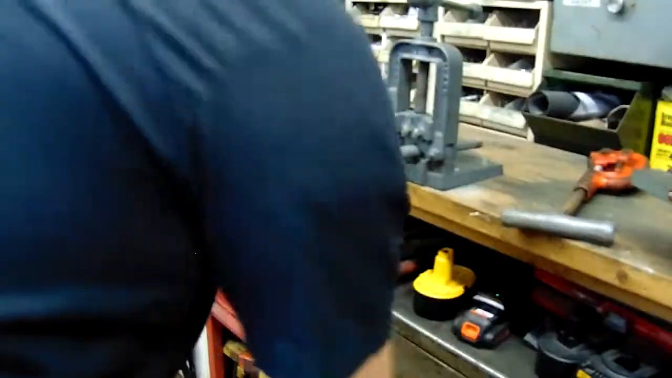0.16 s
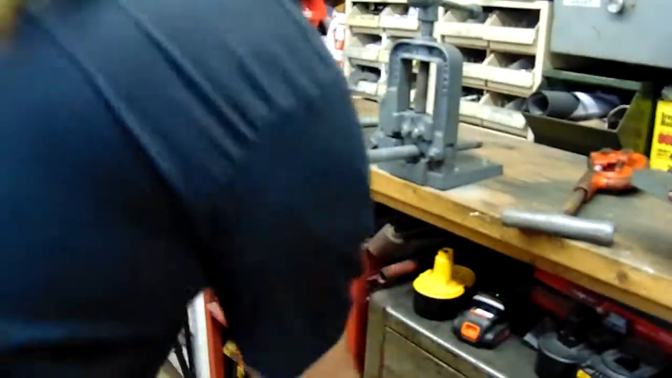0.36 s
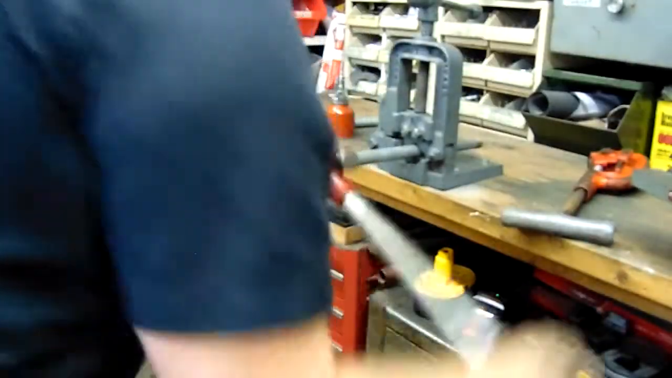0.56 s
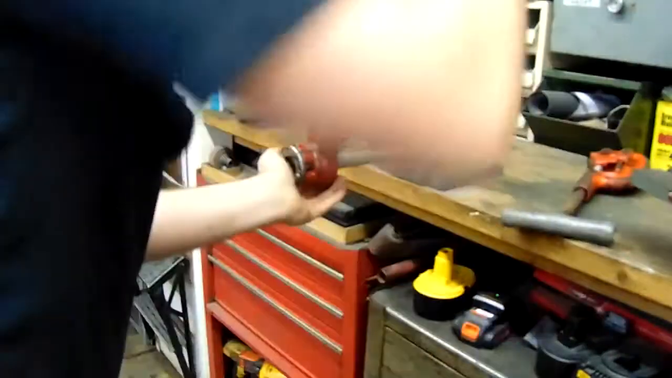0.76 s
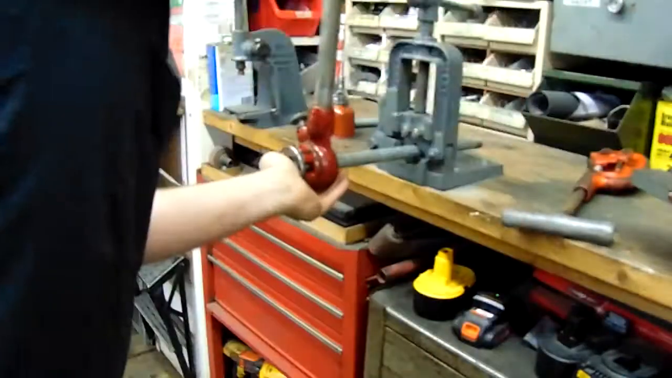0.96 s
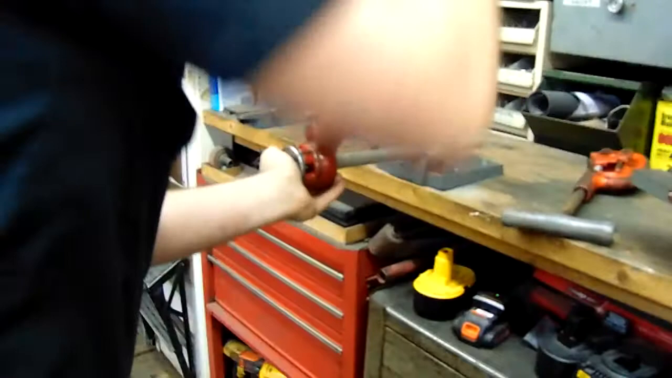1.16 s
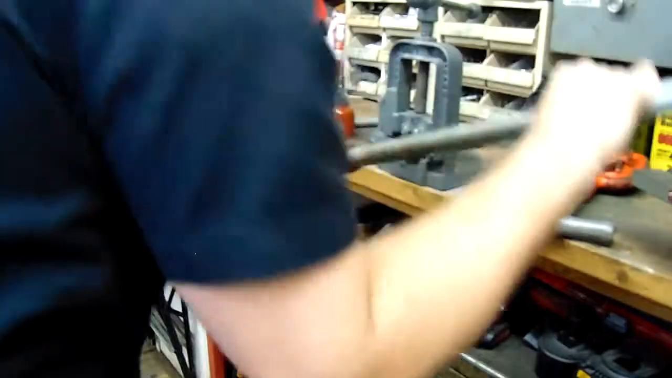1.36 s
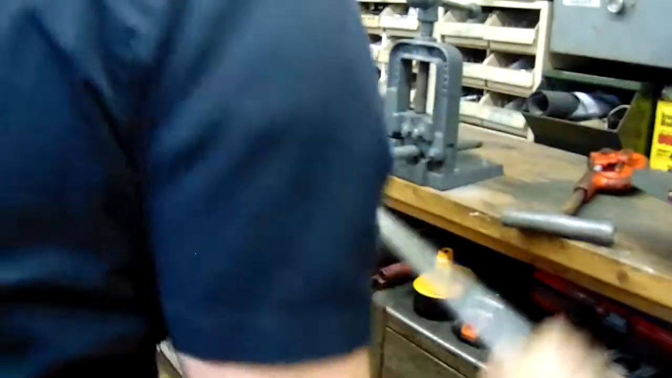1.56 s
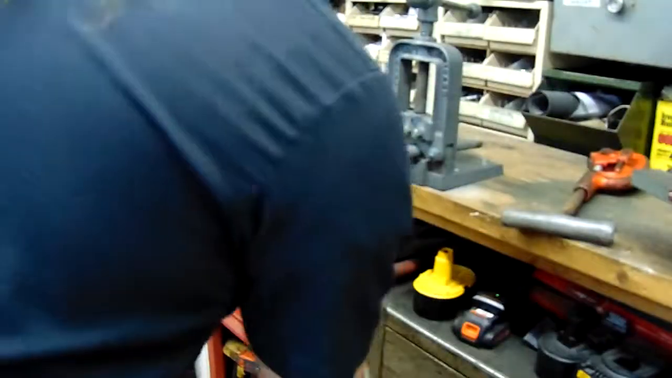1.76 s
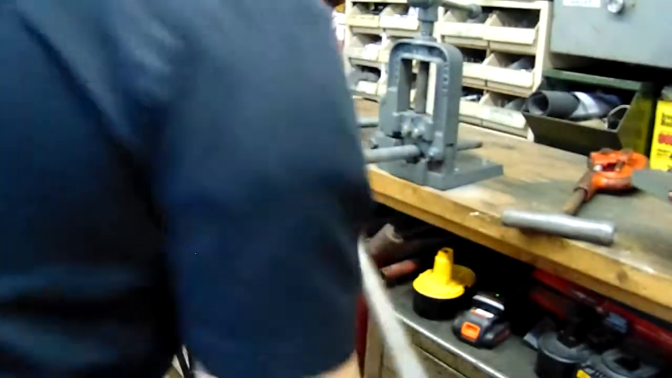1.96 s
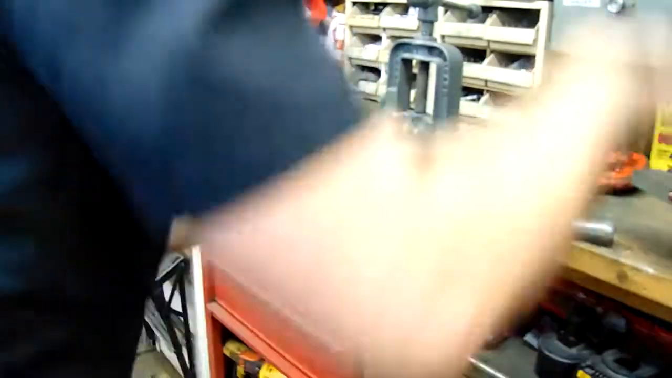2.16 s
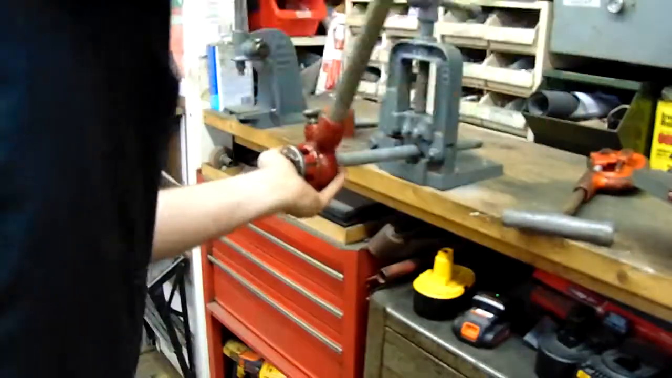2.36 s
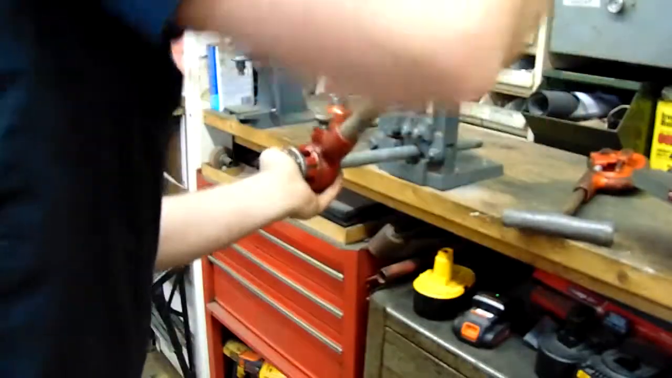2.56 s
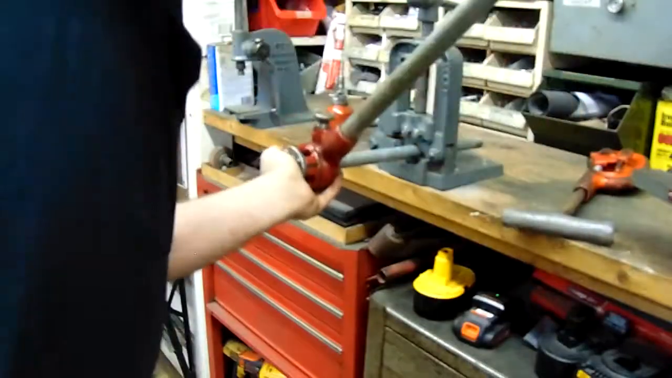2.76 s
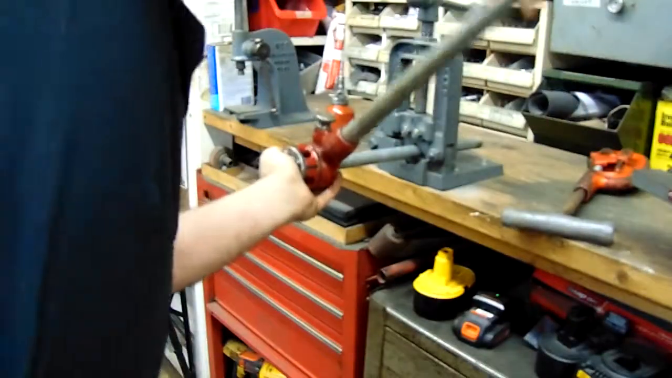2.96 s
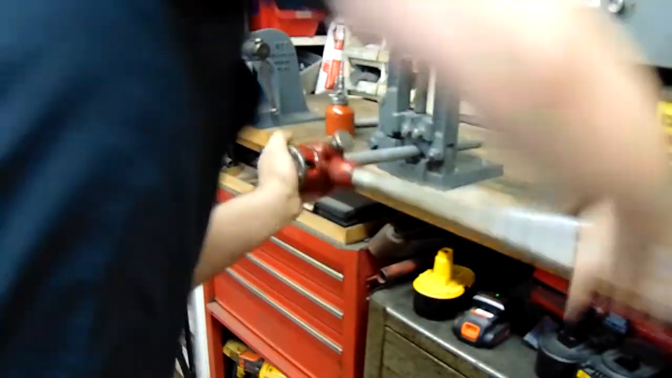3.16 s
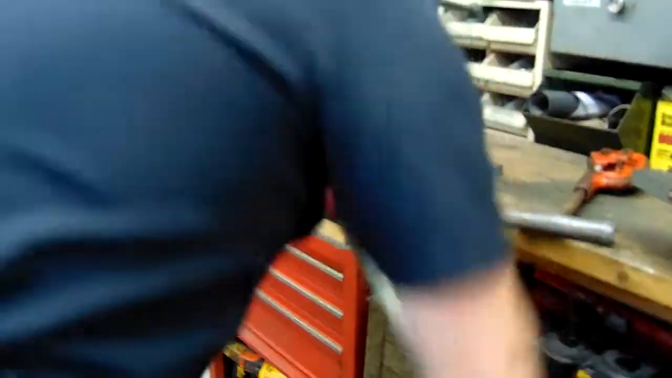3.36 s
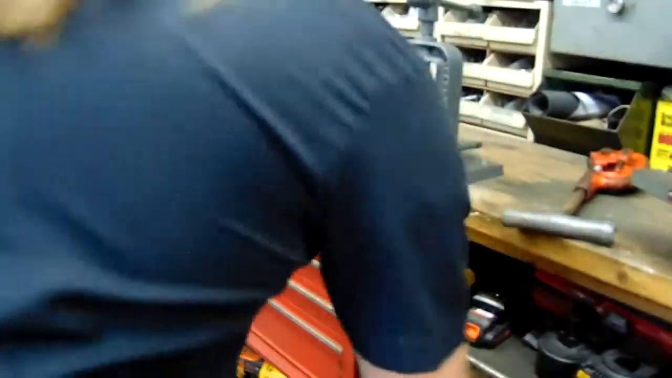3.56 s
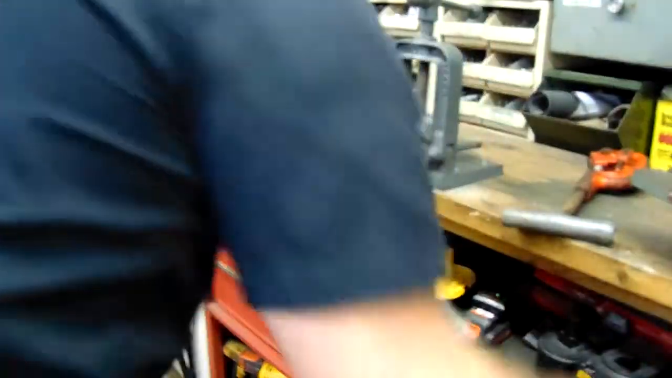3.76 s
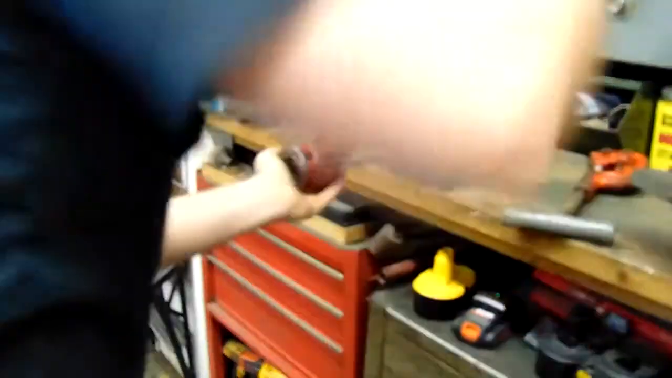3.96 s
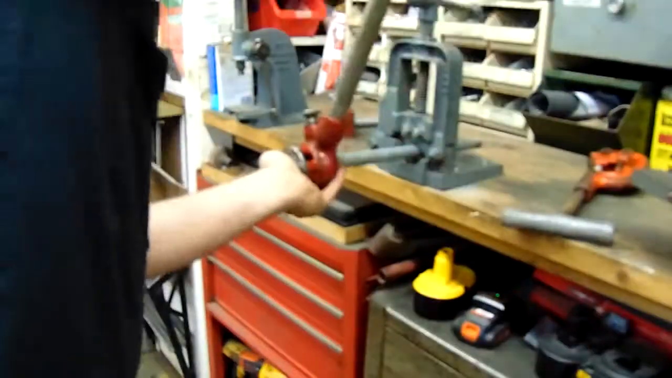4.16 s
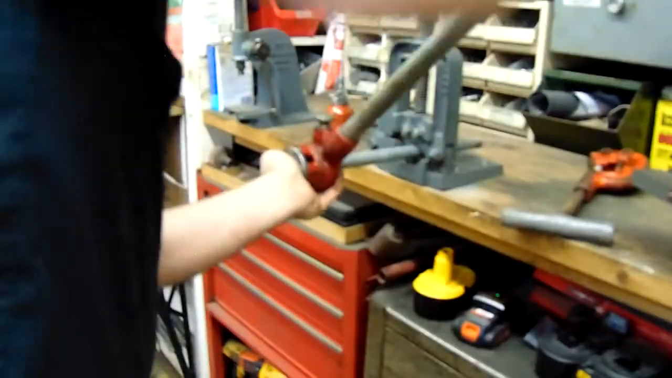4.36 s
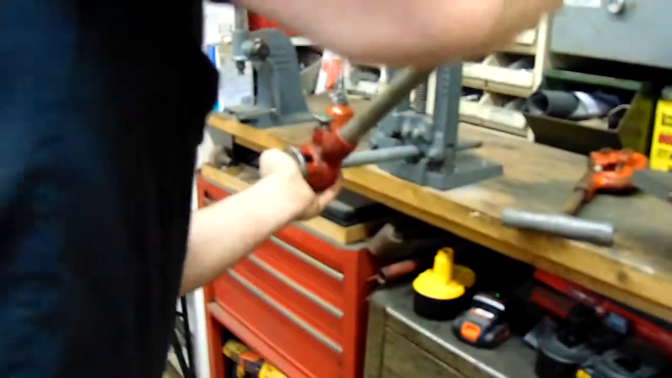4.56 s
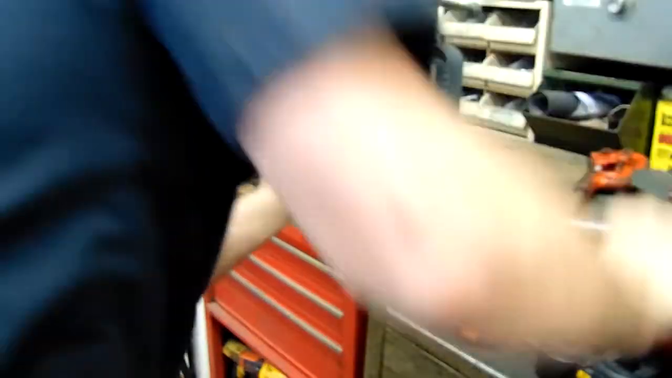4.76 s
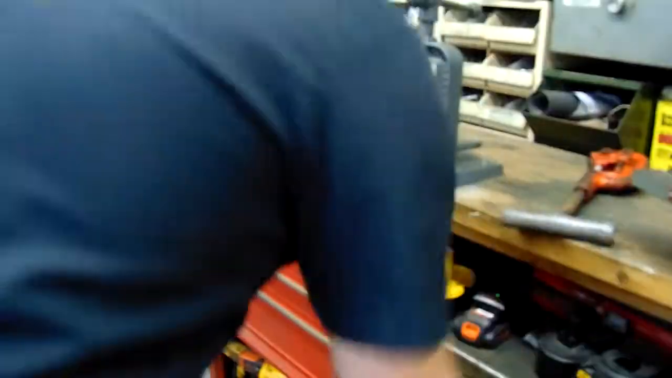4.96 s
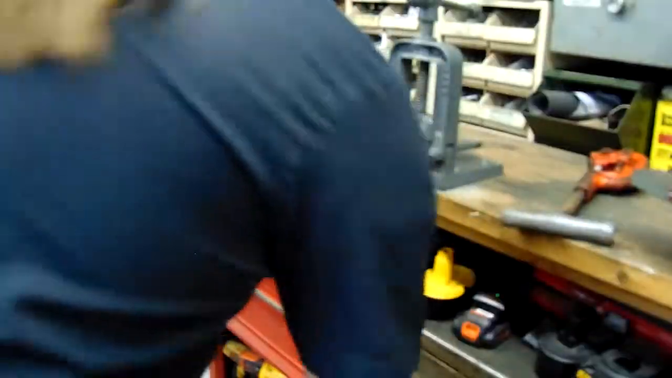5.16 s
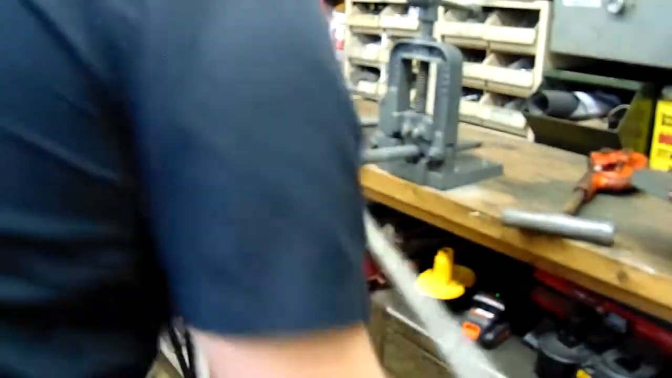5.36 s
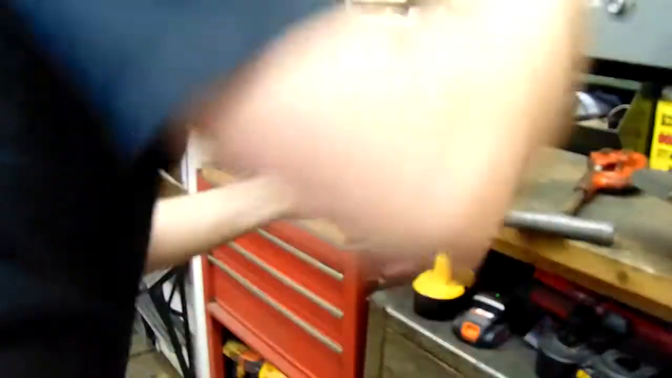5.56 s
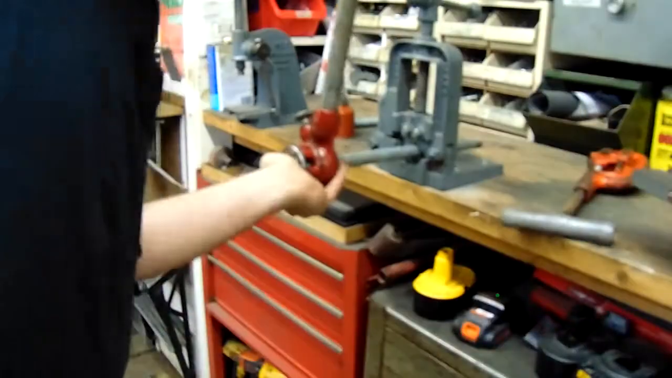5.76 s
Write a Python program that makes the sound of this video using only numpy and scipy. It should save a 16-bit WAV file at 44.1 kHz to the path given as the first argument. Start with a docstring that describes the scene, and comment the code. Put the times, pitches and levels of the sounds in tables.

```python
"""Small workshop: a ratcheting hand threader works a steel pipe held in a bench vice.
On each back swing the pawl snaps over three or four teeth. At each turn of the stroke the loose head
clanks and the bench thuds. On the down stroke the dies scrape softly in the steel.
Faint rumble, hiss and machine hum lie underneath."""
import sys
import numpy as np
from scipy import signal
from scipy.fft import rfft, irfft
from scipy.io import wavfile
from scipy.ndimage import uniform_filter1d

SR = 44100
rng = np.random.default_rng(int(sys.argv[2]) if len(sys.argv) > 2 else 0)


def transcribe(signal):
    """Save signal, clipped to [-1, 1], as a 16-bit WAV file at the path in sys.argv[1]."""
    frames = np.atleast_2d(signal).T
    limited = np.clip(frames, -1, 1)
    pcm = np.round(limited * 32767).astype(np.int16)
    wavfile.write(sys.argv[1], SR, pcm)


N = 256220
BLOW_N = 24576
AGE_S = np.arange(BLOW_N) / SR
OCTAVES_HZ = 30 * 2. ** np.arange(10)

# modes of head and handle: f/Hz, level/dB, t60/s
STEEL_MODES = [(466, 3.5, 0.22), (511, -3, 0.19), (1044, -6.5, 0.3), (1095, -1.5, 0.22), (1500, -22, 0.28),
               (1794, -14.5, 0.44), (2097, -26, 0.11), (2294, -1, 0.15), (2460, -44, 0.084),
               (2910, -20, 0.52), (3180, -16, 0.35), (3237, -10.5, 0.46), (3370, -32, 0.45),
               (3660, -16, 0.2), (3580, -7.5, 0.3), (4130, -38, 0.1), (4150, -13, 0.33),
               (4460, -13.5, 0.26), (4730, -12, 0.36), (4670, -21, 0.51), (5250, -14, 0.47),
               (5480, -14, 0.25), (6770, -24, 0.17), (8600, -6, 0.18), (11450, -12.5, 0.23)]
# contacts of loose head and pipe: t/s, level/dB, contact/ms, leading f/Hz
CLANKS = [(0.146, -59.5, .04, 565), (0.482, -37.5, 0.21, 1003), (0.523, -39, 0.28, 444),
          (0.588, -48, 0.21, 4640), (1.192, -39, 0.068, 480), (1.217, -24.5, 0.44, 657),
          (1.245, -31.5, 0.03, 5000), (1.285, -20.5, .07, 737), (1.423, -29, 1.17, 510),
          (1.841, -25.5, 0.85, 953), (1.955, -36, 1.9, 510), (1.987, -37.5, 0.23, 537),
          (1.998, -28.5, 0.56, 575), (2.03, -39.5, 0.11, 6800), (2.651, -39.5, 0.13, 1060),
          (2.672, -27, 0.16, 475), (3.69, -29.5, 1.2, 513), (3.723, -22.5, 0.21, 4780),
          (4.414, -32, 0.025, 1046), (4.452, -33.5, 0.073, 496), (4.477, -24.5, 0.4, 1087),
          (5.261, -29, 1.06, 517), (5.317, -24, 0.29, 4820)]
# clank base spectrum, tone of the hardest clank, stirred resonances: f/Hz, level/dB
CLANK_SPECTRUM = [(60, -18.5), (160, -16.5), (280, -3), (600, 6), (1000, 7.5), (1450, 2.5), (2500, 4),
                  (4800, -0.5), (7000, -4.5), (10000, -13.5), (14000, -6.5)]
CLANK_TONE = [(800, -1.5), (2600, 4.5), (5400, 1.5), (10000, 0.5)]
CLANK_PEAKS = [(470, 5.5), (1045, 0), (2380, -3), (4850, 1.5), (6770, 1.5), (11200, 6)]


def undb(db):
    """Decibels to gain."""
    return 10 ** (np.asarray(db) / 20)


def lookup(points, hz):
    """Interpolate a (f/Hz, value) table over log frequency."""
    f, values = np.transpose(points)
    return np.interp(np.log(np.maximum(hz, 1)), np.log(f), values)


def decay(t60_s):
    """Exponential fall, 60 dB in t60_s."""
    return np.exp(-np.log(1000) * AGE_S / max(t60_s, 1e-3))


def add(track, t_s, sound):
    """Mix sound into track at t_s."""
    i = max(int(t_s * SR), 0)
    track[i:i + len(sound)] += sound[:max(N - i, 0)]


def shape(x, spectrum):
    """Filter x by a (f/Hz, level/dB) table; rms 1."""
    gain = undb(lookup(spectrum, np.fft.rfftfreq(len(x), 1 / SR)))
    y = irfft(rfft(x) * gain, len(x))
    return y / y.std()


def wander(rate_hz):
    """Smooth random drift, unit spread."""
    hold = int(SR / rate_hz)
    steps = np.repeat(rng.standard_normal(N // hold + 1), hold)
    drift = uniform_filter1d(uniform_filter1d(steps, hold), hold)[:N]
    return drift / drift.std()


def stirred(peaks, scatter_db=3):
    """Each blow excites the resonances a little differently."""
    return [(hz, db + scatter_db * rng.standard_normal()) for hz, db in peaks]


def softened(tone, contact_ms):
    """Long contacts are dull: -12 dB/octave above 1 / contact time."""
    cycles = OCTAVES_HZ * contact_ms / 1000
    return np.c_[OCTAVES_HZ, lookup(tone, OCTAVES_HZ) - 10 * np.log10(1 + cycles ** 4)]


def impact(spectrum, tone, peaks, t60_s, rise_cycles, room_db):
    """Dense short modes of one blow plus room wash; low bands build up more slowly."""
    room_t60 = [(100, 0.83), (400, 0.36), (1500, 0.4252), (3500, 0.4028), (7000, 0.3769), (13000, 0.06)]  # reverberation time: f/Hz, t60/s
    room_wet = [(100, 1), (400, -2.5), (1000, -5), (3000, -11.5), (7000, -5), (13000, -11)]  # reverberation against the blow: f/Hz, level/dB
    f = np.fft.rfftfreq(BLOW_N, 1 / SR)
    # modes bunch unevenly: a random ripple, fine-grained low down and coarser towards the treble
    knots_hz = np.arange(300) ** 2 / 4
    ripple_db = np.interp(f, knots_hz, rng.standard_normal(len(knots_hz))) * np.minimum(f / 900, 1)
    db = lookup(tone, f) + ripple_db
    for hz, peak_db in peaks:
        db += peak_db / (1 + ((f - hz) / 70) ** 2)
    bins = rfft(shape(rng.standard_normal(BLOW_N), spectrum)) * undb(db)
    out = np.zeros(BLOW_N)
    for hz, share in zip(OCTAVES_HZ, np.eye(len(OCTAVES_HZ))):
        band = irfft(bins * lookup(np.c_[OCTAVES_HZ, share], f))
        rise = 1 - np.exp(-(AGE_S / min(rise_cycles / hz, .012)) ** 2)
        room = undb(lookup(room_wet, hz) + room_db) * decay(lookup(room_t60, hz))
        out += band * rise * np.hypot(decay(t60_s), room)
    return out


def ring(modes, scatter_db, detune, rise_cycles):
    """Decaying modes; level, pitch and phase vary per blow."""
    out = np.zeros(BLOW_N)
    for hz, db, t60_s in modes:
        size, shift, phase = rng.standard_normal(3)
        wave = np.sin(2 * np.pi * (hz * (1 + detune * shift) * AGE_S + phase))
        rise = 1 - np.exp(-AGE_S * hz / rise_cycles)
        out += undb(db + scatter_db * size) * wave * decay(t60_s) * rise
    return out


def steel_ring(tone, peaks, pair_db, pair_t60_s):
    """The threader's own modes plus beating pairs set by where the parts touch."""
    modes = list(STEEL_MODES)
    for hz, peak_db in peaks:
        db = .5 * peak_db + pair_db - .5 - hz / 2800  # high modes lose more to friction
        modes += [(hz + split_hz, db, pair_t60_s) for split_hz in (-13, 13)]
    modes = [(hz, db + lookup(tone, hz), t60_s) for hz, db, t60_s in modes]
    return ring(modes, scatter_db=2.5, detune=0.0021, rise_cycles=10.7)


def shop():
    """Steady rumble and hiss, wavering machine hum."""
    hum_lines = [(355, -66), (554.5, -65.5)]  # f/Hz, rms level/dB
    noise_spectrum = [(20, 1), (40, 0.5), (58, 0), (110, -6), (170, -23.5), (230, -7.5), (320, -19),
                      (420, -15.5), (700, -14), (1000, -15), (1600, -20), (3600, -25.5), (5700, -28.5),
                      (14000, -30)]  # f/Hz, level/dB
    t = np.arange(N) / SR
    hum = np.zeros(N)
    for hz, db in hum_lines:
        amplitude = np.sqrt(2) * undb(db + 2 * wander(3.52))
        hum += amplitude * np.sin(2 * np.pi * hz * t + wander(3.8))
    return hum + shape(rng.standard_normal(N), noise_spectrum) * undb(-54 + .5 * wander(5.47))


def push(bite_db_per_s=240, release_db_per_s=232):
    """Force on the dies per down stroke: bite, build or ease, release."""
    strokes = [(0, 0.337, -58, -6), (1.574, 1.804, -50, 40), (3.16, 3.57, -54, 11.5),
               (4.75, 5.15, -49.5, 20.5)]  # start/s, end/s, end level/dB, growth/(dB/s)
    t, force = np.arange(N) / SR, np.zeros(N)
    for start_s, end_s, db, growth in strokes:
        edges_db = bite_db_per_s * np.maximum(start_s - t, 0) + release_db_per_s * np.maximum(t - end_s, 0)
        force += undb(db + growth * (np.clip(t, start_s, end_s) - end_s) - edges_db)
    return force


def dies():
    """Tiny chips tear from the pipe: a dense, uneven scrape that rings the steel."""
    scrape_spectrum = [(200, -3), (350, 1.5), (700, 0.5), (1030, 1.5), (1500, -2), (1900, -10.5),
                       (2300, -4.5), (3300, -7.5), (4300, -12), (5200, -23.5), (14000, -21.5)]  # f/Hz, level/dB
    chips = rng.standard_normal(N) * undb(0.47 * rng.exponential(size=N))
    damped_modes = [(hz, 0, .05) for hz, _, _ in STEEL_MODES]  # engaged dies damp the head
    head = ring(damped_modes, scatter_db=1.0, detune=0.0082, rise_cycles=1)
    ringing = signal.fftconvolve(chips, head / np.linalg.norm(head))[:N]
    scrape = shape(chips + undb(-7.5) * ringing, scrape_spectrum)
    return scrape * push() * undb(1.3 * wander(60) + 2.5)


def bench(settle_s=0.086, settle_db=-5.5, rattle_lag_s=0.05):
    """The vice loads the wooden bench: it thuds, rocks, settles back once and rattles the head."""
    turns = [(1.295, -22, -42.5), (1.999, -32, -54), (2.695, -31.5, -38.5), (3.734, -30.5, -46),
             (4.484, -35.5, -38), (5.322, -28, -47.5)]  # ends of the handle's swing: t/s, thud/dB, rocking/dB
    bench_modes = [(118.6, -17, 0.38), (236.5, 1, 0.15), (258.1, 6, 0.14), (295.4, -1.5, 0.24),
                   (326, 1, 0.27), (481, -6, 0.23), (626, -3, 0.14), (760, -4.5, 0.21), (839, -10.5, 0.35)]  # bench and vice: f/Hz, level/dB, t60/s
    rock_spectrum = [(20, 0), (42, -4.5), (57, 9), (70, -21), (83, 11), (102, -3), (123, 2.5), (165, -15),
                     (240, 1), (500, -17.5), (1000, -16), (3000, -39)]  # f/Hz, level/dB
    out = np.zeros(N)
    # brief contacts pass less to the bench
    knocks = [(t_s, db - 9.5 + 10 * np.log10(contact_ms)) for t_s, db, contact_ms, _ in CLANKS]
    thuds = [(t_s, db) for t_s, db, _ in turns]
    for t_s, db in knocks + thuds:
        add(out, t_s, undb(db) * ring(bench_modes, scatter_db=1.0, detune=0.013, rise_cycles=0.41))
    rattle_tone = softened(CLANK_TONE, contact_ms=.38)
    for t_s, _, db in turns:
        for lag_s, loss_db in ((0, 0), (settle_s, settle_db)):
            rocking = shape(rng.standard_normal(BLOW_N), rock_spectrum) * (decay(0.59) - decay(0.028))
            add(out, t_s + lag_s, undb(db + loss_db + 7.5) * rocking)
        rattle = impact(CLANK_SPECTRUM, rattle_tone, CLANK_PEAKS, t60_s=0.075, rise_cycles=3.1, room_db=8)
        add(out, t_s + rattle_lag_s, undb(db + 3.5) * rattle)
    return out


def clanks(lead_db=4.5):
    """The loose head takes up its slack: contacts from light, bright clinks to dull knocks."""
    out = np.zeros(N)
    for t_s, db, contact_ms, lead_hz in CLANKS:
        tone = softened(CLANK_TONE, contact_ms)
        peaks = [(lead_hz, lead_db)] + stirred(CLANK_PEAKS)
        clank = impact(CLANK_SPECTRUM, tone, peaks, t60_s=0.11, rise_cycles=1.8, room_db=2.84)
        clink = steel_ring(tone, peaks, pair_db=-4.5, pair_t60_s=0.2)
        clink_db = -22 - 0.4 * db  # a light touch leaves the steel freer to ring
        add(out, t_s, undb(db) * (clank + undb(clink_db) * clink))
    return out


def pawl(pivot_hz=2980, lead_db=(12.5, 10, 8), tick_ahead_s=0.0045):
    """The sprung pawl ticks off a tooth, slams into the next gap and rebounds once."""
    # one row a tooth: t/s, level/dB, tilt/(dB/octave), rebound/dB, 3 x leading f/Hz
    snaps = [(0.656, -18, -0.14, -2.5, 6610, 4686, 972), (0.748, -16.5, 0.4, 1, 6670, 2280, 4570),
             (0.848, -19, -0.58, -1, 4610, 2245, 4920), (0.969, -20, 0, 0, 2056, 4904, 4190),
             (2.182, -18.5, 0.34, 0.5, 4880, 5080, 6270), (2.293, -16, 0.075, 5.5, 2370, 1060, 782),
             (2.423, -21.5, 0.65, 1.5, 2462, 4750, 5500), (3.925, -19, 2.35, -1.5, 4870, 3110, 6070),
             (4.038, -16, 0.88, -1, 3057, 4613, 1062), (4.167, -18.5, -0.044, -0.5, 4620, 3779, 2248),
             (5.523, -16, 0.048, -0.5, 842, 4890, 1610), (5.634, -15, 0.45, -3.5, 1603, 905, 6850),
             (5.744, -15.5, 0.59, 1.5, 4560, 3550, 1640)]
    # snap base spectrum, tone, head resonances: f/Hz, level/dB
    spectrum = [(80, -7.5), (160, -17), (250, 1.5), (350, -4.5), (470, 5.5), (680, 0.5), (1000, 5.5),
                (1350, -0.5), (2300, 0), (3300, 1.5), (4800, -2), (6500, -6), (10000, -9), (11300, -6.5),
                (14000, -9)]
    snap_tone = [(800, -3), (2600, -0.5), (5400, 1.5), (10000, 1)]
    head_peaks = [(470, 0.5), (1065, -1.5), (2330, 1), (3240, 2), (4620, 0.5), (4870, -1), (6250, -7.5),
                  (6770, 1.5), (11200, 1.5), (12600, 6)]
    out = np.zeros(N)
    for t_s, db, tilt, rebound_db, *lead_hz in snaps:
        tone = [(hz, level + tilt * np.log2(hz / pivot_hz)) for hz, level in snap_tone]
        # the head turns with every tooth, so other resonances lead each time
        lead = list(zip(lead_hz, lead_db))
        peaks = lead + [(hz, lift_db) for hz, lift_db in stirred(head_peaks)
                        if min(abs(hz - f) for f in lead_hz) > 100]
        snap = impact(spectrum, tone, peaks, t60_s=0.093, rise_cycles=7.3, room_db=-2.5)
        clink = steel_ring(tone, lead, pair_db=-7, pair_t60_s=0.22)
        rebound = impact(spectrum, tone, peaks, t60_s=0.02, rise_cycles=0.88, room_db=-22)
        tick_tone = softened(tone, contact_ms=0.164)
        tick = impact(spectrum, tick_tone, peaks, t60_s=0.066, rise_cycles=0.5, room_db=-15.5)
        flight_s = 0.0036 * undb(rebound_db)  # a stronger rebound flies longer
        add(out, t_s - tick_ahead_s, undb(db - 18) * tick)
        add(out, t_s, undb(db + 3) * (snap + undb(-12.5) * clink))
        add(out, t_s + flight_s, undb(db + rebound_db + 4) * rebound)
    return out


def scene():
    """Mono sum of all sources."""
    return (pawl() + clanks() + bench() + dies() + shop())[None]


def record(dry):
    """Soft clip, then low-pass."""
    ceiling, top_hz = 0.8, 14350
    lowpass = signal.ellip(10, .2, 70, top_hz, fs=SR, output="sos")
    return signal.sosfilt(lowpass, ceiling * np.tanh(dry / ceiling))


dry = scene()
out = record(dry)
transcribe(out)
```